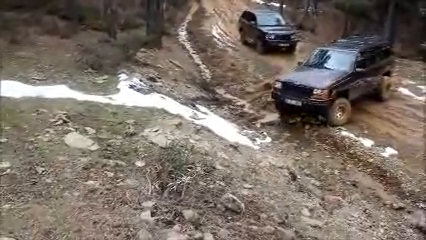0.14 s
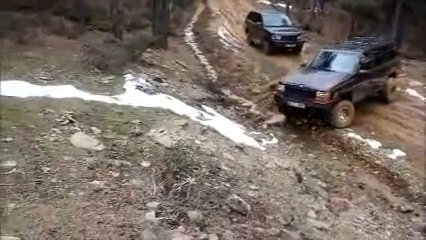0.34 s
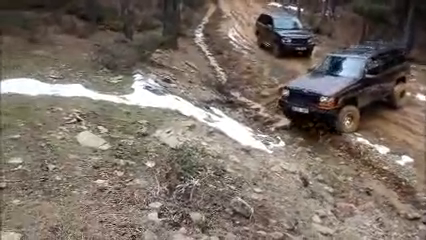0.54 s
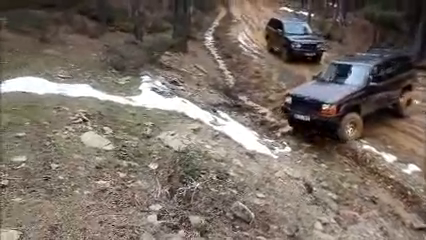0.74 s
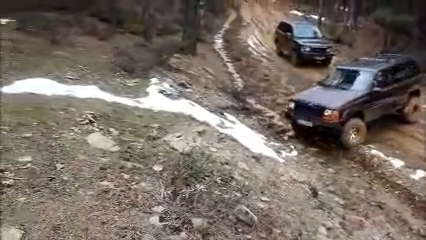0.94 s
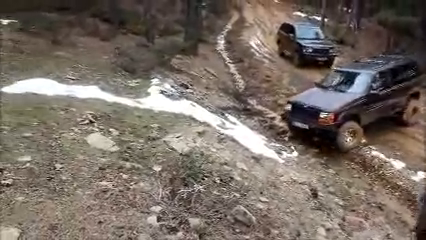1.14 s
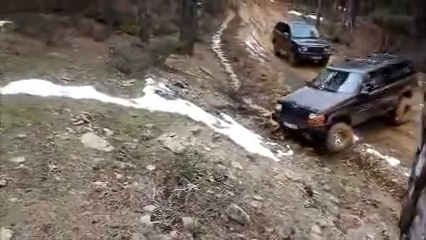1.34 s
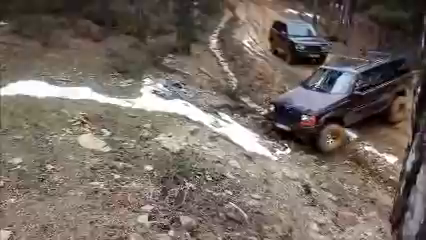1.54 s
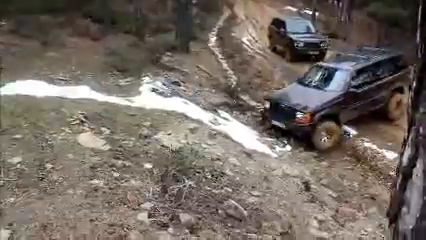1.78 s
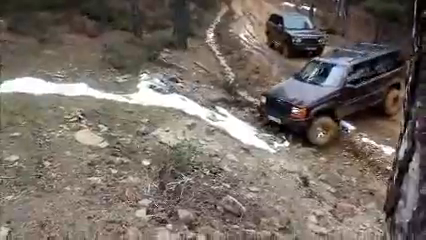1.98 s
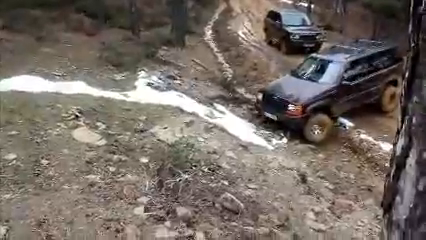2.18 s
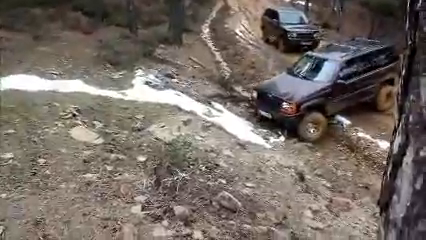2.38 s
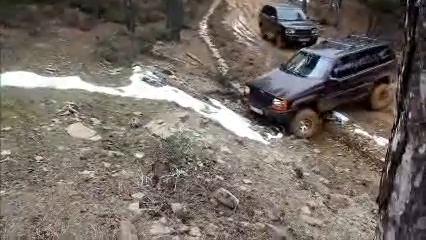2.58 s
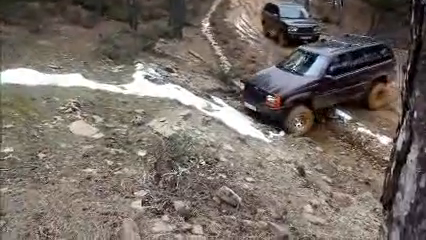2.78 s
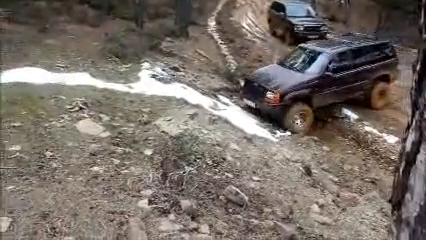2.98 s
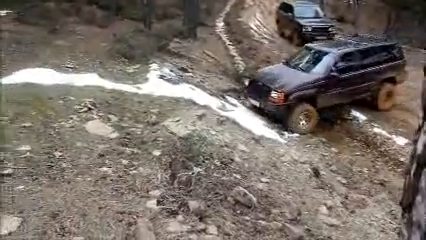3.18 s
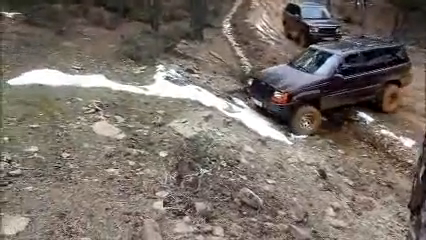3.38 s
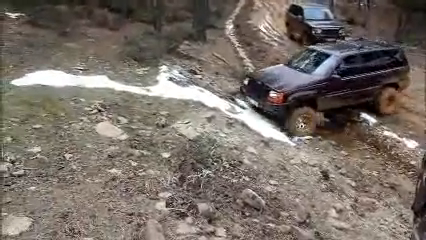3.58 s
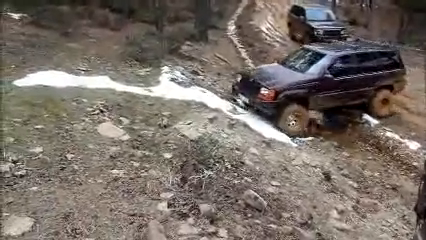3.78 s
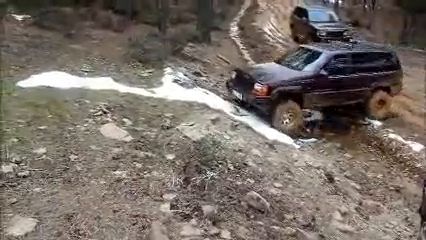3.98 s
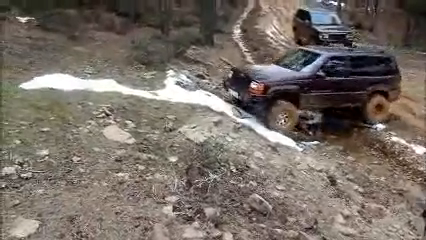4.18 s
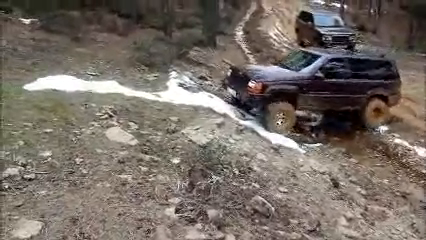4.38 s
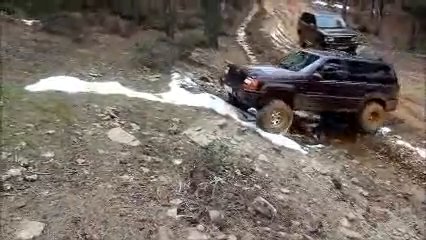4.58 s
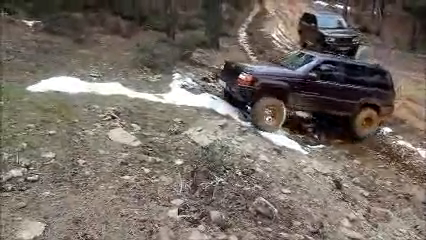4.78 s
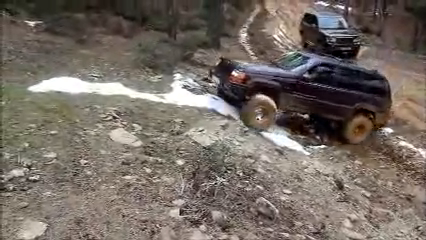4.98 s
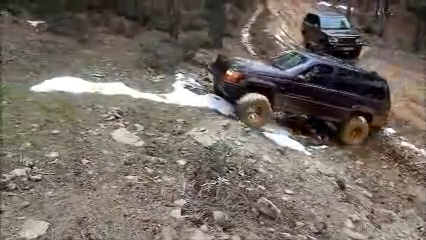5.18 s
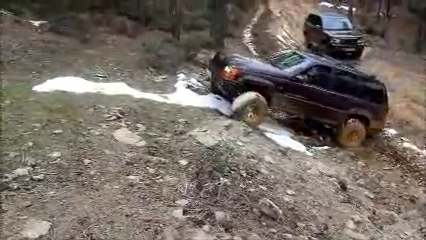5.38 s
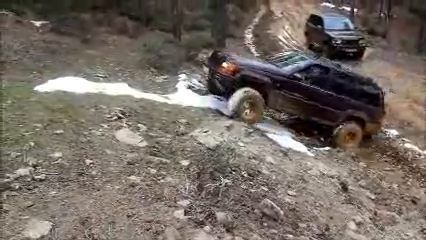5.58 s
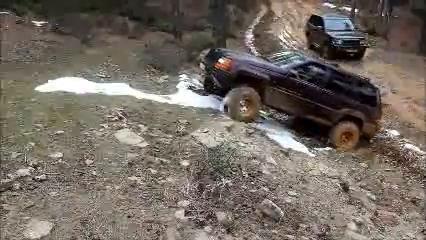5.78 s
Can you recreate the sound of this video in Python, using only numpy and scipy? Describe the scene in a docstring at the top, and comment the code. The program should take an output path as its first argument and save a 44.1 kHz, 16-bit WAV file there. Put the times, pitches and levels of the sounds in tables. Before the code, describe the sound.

A big petrol engine burbles at idle, revs in two swelling blips, then pulls hard as tyres crunch grit and stones tick on a forest trail.

```python
"""Four-wheel-drive on a forest trail

A V8 crawls up a rutted trail, heard from the bank above: it burbles at idle, is blipped twice, then pulls at length.
Timed puffs of gas ring the exhaust pipe, with clean engine orders on top; throbbing noise makes the belts and fan.
Clumped grains grind under the tyres with a high airy hiss; short resonant bursts are stone ticks and a twig.
Dense slips ring the underbody as a rock scrapes it. The ground sounds echo among the trees."""
import sys
import numpy as np
from scipy import signal
from scipy.fft import rfft, irfft, next_fast_len
from scipy.io import wavfile
from scipy.ndimage import uniform_filter1d

SR = 44100
rng = np.random.default_rng(int(sys.argv[2]) if len(sys.argv) > 2 else 0)


def wav_out(sig):
    """Save sig, one row per channel (or a flat mono array), as 16-bit PCM at SR to the path in sys.argv[1]."""
    wavfile.write(sys.argv[1], SR, np.round(np.clip(np.atleast_2d(sig).T, -1, 1) * 32767).astype(np.int16))


N = 257525
TIME = np.arange(N) / SR

# engine speed on the throttle, two blips and a long pull: (time [s], firing rate [per s])
FIRING_RATE = [(2.17, 42.8), (2.35, 65.5), (2.5, 82.2), (2.66, 89.7), (2.8, 82.9), (3.01, 61.6),
               (3.16, 53.1), (3.33, 83.9), (3.46, 108.9), (3.55, 113.5), (3.66, 106.6), (3.75, 95.0),
               (3.89, 75.0), (3.99, 62.9), (4.05, 60.3), (4.4, 76.7), (4.6, 80.9), (4.95, 87.4),
               (5.05, 86.6), (5.22, 80.8), (5.35, 85.8), (5.54, 98.1), (5.69, 102.9), (5.84, 101.1)]
# loudness of the tailpipe: (time [s], level [dB])
EXHAUST_LEVEL = [(0.0, -33.5), (0.86, -36.5), (1.58, -34.5), (2.1, -38), (2.47, -21), (2.75, -19),
                 (3.15, -32), (3.25, -22.5), (3.37, -19), (3.67, -19), (4.02, -31.5), (4.15, -25.5),
                 (4.8, -16), (5.02, -21), (5.06, -17.5), (5.84, -15.5)]
# the eight exhaust puffs of a cycle, some delayed by a longer way through the manifold:
# (idle relative level [dB], idle lateness [ms], loaded relative level [dB], loaded lateness [ms])
PUFFS = [(-3.5, 2.8, -.2, 5.2), (-3.5, -1.1, -4.9, -.3), (-2.5, -.5, 2.5, 5.9), (-1.5, 3.6, .8, 5.9),
         (1, -1.4, -.6, -.8), (-6, -1.2, 3, 5.2), (-10, -.5, -2, 5.4), (4.5, -1.7, .3, 0)]
# silencer and pipe; the slow puffs of idling carry more bass:
# (frequency [Hz], idle relative level [dB], loaded relative level [dB])
PIPE_COLOUR = [(24.6, -27, -23), (40, -15, -4), (52.4, 9, -4), (71, 12, 10), (96, 10, 8.5), (116, 7.5, 11),
               (145, 12.5, 15), (155.6, 18.5, 15), (168, -8, 21), (183.6, 12.5, 14.5), (262, 9.5, 14),
               (280.4, -8.5, 14.5), (318, -31, -4.5), (337, -20, 0.5), (445, -24, -3), (940, -58, -55)]
# clean lines in the exhaust under load:
# (multiple of the engine cycle [], pulling relative level [dB], top-revs relative level [dB])
SINGING_ORDERS = [(5, -9, 3), (8, -7, 6), (10, -24, 0), (11, -5, 3), (13, -11, -10), (14, -17, -7),
                  (16, 0, -5), (19, -14, -7), (21, -6, -8), (22, -7, -4), (24, -9, -9), (25, -3, -8)]
# fan and belt noise: (frequency [Hz], relative level per Hz [dB])
BAY_COLOUR = [(250, 5), (400, -3.5), (600, 0), (780, -2.5), (1100, -4), (1500, -6), (2100, -7), (2800, -13),
              (3800, -14.5), (4800, -22), (7000, -27), (9500, -33), (15500, -34.5)]
# ringing of the engine's covers and brackets: (frequency [Hz], width [Hz], relative level [dB])
COVER_MODES = [(577, 44, -5.5), (1047, 54, 1.5), (1208, 37, 2), (1300, 21, 8)]
# a hum that comes and goes, perhaps the steering pump; rise and fall are times per 20 dB:
# (peak time [s], level [dB], rise [s], fall [s])
HUM_SWELLS = [(3.75, -35, 0.15, 0.34), (4.36, -42, 0.14, 0.3)]
# grit crushed by the tread: (frequency [Hz], relative level per Hz [dB])
GRAVEL_COLOUR = [(300, 1.5), (600, 8.5), (1200, 1.5), (2000, -4.5), (3700, -8.5), (5000, -14), (7500, -19),
                 (15000, -17)]
# high airy hiss: (frequency [Hz], relative level per Hz [dB])
HISS_COLOUR = [(3000, 8), (6000, 6.5), (9000, 3.5), (12000, 6), (15500, -5.5)]
# a tyre slips and crunches on grit; rise and fall are times per 20 dB:
# (peak time [s], level [dB], rise [s], fall [s], pitch [Hz])
TYRE_SLIPS = [(2.69, -34.5, .12, 0.078, 2600), (3.336, -26.5, 0.015, 0.025, 2560),
              (3.374, -29.5, 0.028, 0.053, 2820), (3.436, -29, 0.019, 0.11, 2200),
              (3.5, -38.5, 0.27, 0.41, 1200), (3.546, -33, 0.012, .025, 1900),
              (3.572, -23, .015, 0.013, 900), (3.594, -34, 0.061, 0.077, 2300),
              (5.555, -30.5, .06, 0.035, 1750), (5.578, -34.5, .02, 0.051, 3300),
              (5.711, -27.5, 0.06, 0.11, 1440), (5.795, -39, .025, .05, 2000),
              (5.825, -25, 0.083, 0.08, 1080), (5.69, -34, .2, 0.33, 535)]
# the high airy hiss swells and fades; rise and fall are times per 20 dB:
# (peak time [s], level [dB], rise [s], fall [s])
HISS_SWELLS = [(3.95, -47, 0.39, 1.33), (4.9, -47, 0.17, .25), (5.77, -46, 0.14, 0.37)]
# the loudest stone ticks, one during idle, the rest as the wheels roll; levels before the trims in stones():
# (start time [s], peak level [dB], pitch [Hz], 60 dB decay [s], bright-edge level [dB])
STONE_TICKS = [(1.543, -22.5, 3050, 0.028, -56), (2.6682, -28, 2148, .03, -45),
               (2.7633, -36, 2065, .02, -44), (2.9084, -25, 2130, 0.018, -26),
               (3.0343, -27, 2052, 0.027, -44), (3.1016, -22, 2820, 0.026, -41),
               (3.152, -29, 4500, 0.022, -52), (3.211, -21.5, 2060, 0.071, -42),
               (3.282, -19, 3400, 0.027, -49), (3.3267, -25, 2800, .015, -38),
               (3.3556, -22, 3550, .014, -38), (3.4254, -20, 3300, 0.027, -32),
               (3.4848, -7.5, 1880, .009, -45), (3.489, -21, 1970, 0.019, -45),
               (3.621, -14.5, 2500, 0.01, -44), (3.7026, -20.5, 3850, .014, -58.5),
               (4.7737, -22, 2010, 0.038, -54)]
# the rock catches the underbody; rise and fall are times per 20 dB:
# (peak time [s], level [dB], rise [s], fall [s])
ROCK_SCRAPES = [(4.909, -13.5, 0.011, 0.034), (4.945, -28, 0.017, 0.043), (5.01, -25.5, 0.085, 0.13)]
# rasp of rock on steel: (frequency [Hz], relative level per Hz [dB])
SCRAPE_COLOUR = [(400, -2), (750, -8.5), (1150, 2), (2100, -4), (3700, -6), (5500, -15), (7500, -26),
                 (15000, -56)]
# steel of the underbody: (frequency [Hz], width [Hz], relative level [dB])
UNDERBODY_MODES = [(1112, 110, 10), (1190, 54, 12), (1780, 66, 0), (2078, 87, 0), (3300, 62, 2),
                   (3703, 67, 10), (4600, 80, -23)]
# a twig breaking fibre by fibre: (start time [s], peak level [dB], pitch [Hz], 60 dB decay [s])
TWIG_SNAPS = [(0.7428, -15, 1220, 0.016), (0.7515, -11, 2820, 0.0028), (0.768, -26, 11000, 0.0059),
              (0.7700, -17, 3000, 0.0061), (0.777, -17.5, 2800, 0.0078), (0.802, -24.5, 3480, 0.023)]

# at idle the engine hunts slowly about its mean firing rate, after settling from a faster start
IDLE_FIRING_HZ, HUNT_HZ, HUNT_PERIOD_S = 47.7, 2.2, 1.44
SETTLE_HZ, SETTLE_S = 2.6, .25
START_CYCLE = .235  # fraction of an engine cycle
THROTTLE_S, THROTTLE_RISE_S = 2.17, 0.15  # the driver takes up the load
# chance spread of the loaded firings in level and timing; at idle both are this many times wider
UNEVEN_DB, JITTER_S, IDLE_UNEVENNESS = .8, .0001, 1.6
# gas rush against the puffs at idle speed; it rushes harder with the revs
RUSH_DB, RUSH_DB_PER_OCTAVE = -21, 6
SINGING_DB = -2  # clean lines against the puffs and gas
# the pipe spreads each crest in time [radians per order squared], up to twice as much at top revs
PIPE_SMEAR = .018
GROWL_FROM_OCTAVES, GROWL_FULL_OCTAVES = 0.83, 0.95  # engine speed above idle
# the whirr under the bonnet grows with the revs, and grows steadily louder towards the end
BAY_IDLE_DB, BAY_DB_PER_OCTAVE = -36, 3.5
LATE_RISE_S, LATE_RISE_DB_PER_S = 4.73, 2.5
HUM_HZ, HUM_SAG_HZ_PER_S = 364.6, 5  # pitch at the first hum's peak, and its fall
ROLL_START_S, ROLL_RISE_S = 2.4, 0.18  # the wheels bite and start to roll
GRIND_DB, GRIND_DB_PER_OCTAVE, HISS_DB = -49.5, -3, -57  # grinding is set at idle speed
STONY_FROM_S, STONY_TO_S = 2.65, 4.1  # the tyres cross a patch of loose pebbles
PEBBLES_PER_S, PEBBLE_DB, PEBBLE_SPREAD_DB = 20, -29, 4.5
PEBBLE_HZ, PEBBLE_SPREAD_OCTAVES = 2940, 0.28
CUTOFF_HZ = 15800


def engine_speed():
    """Firings a second: the idle settles and hunts until the driver takes over."""
    hunting = HUNT_HZ * np.cos(2 * np.pi * TIME / HUNT_PERIOD_S)
    settling = SETTLE_HZ * np.exp(-TIME / SETTLE_S)
    idling = IDLE_FIRING_HZ + hunting + settling
    return np.where(TIME < THROTTLE_S, idling, in_time(FIRING_RATE)[0])


def exhaust(cycles, revs):
    """One puff per firing into the pipe; the lopsided pattern that makes the burble changes with load."""
    load = np.clip((TIME - THROTTLE_S) / THROTTLE_RISE_S, 0, 1)
    firing = np.arange(int(len(PUFFS) * cycles[0]) + 1, int(len(PUFFS) * cycles[-1]))
    when = np.interp(firing / len(PUFFS), cycles, TIME)
    share = np.interp(when, TIME, load)
    pattern = np.array(PUFFS)[firing % len(PUFFS)].T
    puff_db, late_ms = (1 - share) * pattern[:2] + share * pattern[2:]

    # each firing differs a little in strength and timing
    unevenness = share + IDLE_UNEVENNESS * (1 - share)
    chance = rng.standard_normal((len(firing), 2)) * unevenness[:, None]
    at = (when + late_ms / 1000) * SR + JITTER_S * SR * chance[:, 1]
    at = np.clip(at, 0, N - 1).astype(int)
    puffs = rms_one(np.bincount(at, from_db(puff_db + UNEVEN_DB * chance[:, 0]), N))

    # turbulent gas rushes through the same pipe
    rush = from_db(RUSH_DB + RUSH_DB_PER_OCTAVE * revs) * rng.standard_normal(N)
    gas = puffs + rush
    pipe = np.array(PIPE_COLOUR)
    idle_pipe, loaded_pipe = pipe[:, :2], pipe[:, ::2]
    burble = rms_one(coloured((1 - load) * gas, idle_pipe) + coloured(load * gas, loaded_pipe))
    song = rms_one(coloured(load * singing(cycles, revs), loaded_pipe))
    sound = burble + from_db(SINGING_DB) * song

    # level out the slow loudness, then ride it along the level curve
    power = uniform_filter1d(uniform_filter1d(sound ** 2, size=SR // 6), size=SR // 6)
    return from_db(in_time(EXHAUST_LEVEL)[0]) * sound / np.sqrt(power + 1e-20)


def singing(cycles, revs):
    """Clean orders crest with the strongest puff of each cycle; the low ones growl near the top of the revs."""
    growl = np.clip((revs - GROWL_FROM_OCTAVES) / (GROWL_FULL_OCTAVES - GROWL_FROM_OCTAVES), 0, 1)
    strongest = np.argmax(np.array(PUFFS)[:, 2])
    late_s = PUFFS[strongest][3] / 1000
    angle = 2 * np.pi * (np.interp(TIME - late_s, TIME, cycles) - strongest / len(PUFFS))
    song = np.zeros(N)
    for order, pull_db, top_db in SINGING_ORDERS:
        gain = from_db(pull_db + growl * (top_db - pull_db))
        smear = PIPE_SMEAR * (1 + growl) * (order - 2 * len(PUFFS)) ** 2
        song += gain * np.cos(order * angle - smear)
    return song


def engine_bay(cycles, revs, throb_db=0.7, rattle_db=0.68, flutter_db=1.0, tick_db=-8, ring_db=-42, knock_db=7):
    """Fan and belt noise throbs with the firings; the covers are shaken twice a turn."""
    firing = np.cos(2 * np.pi * len(PUFFS) * cycles)
    knock = np.cos(np.pi * len(PUFFS) * cycles)
    clatter = rng.standard_normal(N) + from_db(tick_db) * grains(250, spread_db=2.0)
    throb = from_db(throb_db * firing + rattle_db * knock + flutter_db * drift(40))
    whirr = rms_one(coloured(clatter * throb, BAY_COLOUR))
    shake = rng.standard_normal(N) * from_db(knock_db * knock)
    ring = rms_one(ringing(shake, COVER_MODES))
    late_rise_db = LATE_RISE_DB_PER_S * np.maximum(TIME - LATE_RISE_S, 0)
    whirr_db = BAY_IDLE_DB + BAY_DB_PER_OCTAVE * revs + late_rise_db
    return from_db(whirr_db) * whirr + from_db(ring_db) * ring


def hum(waver_db=2):
    """A plain tone sags a little in pitch as it comes and goes."""
    hz = HUM_HZ - HUM_SAG_HZ_PER_S * (TIME - HUM_SWELLS[0][0])
    gain = swells(HUM_SWELLS) * from_db(waver_db * drift(23))
    return gain * np.sqrt(2) * np.sin(2 * np.pi * np.cumsum(hz) / SR)


def tyres(revs, clump_db=3.0, slip_width=2.34):
    """Rolling wheels crush grit in clumps under an airy hiss; each slip crunches at its own pitch."""
    rolling = np.clip((TIME - ROLL_START_S) / ROLL_RISE_S, 0, 1)
    crushing = grains(3500, spread_db=2.5) * from_db(clump_db * drift(140))
    grit = rms_one(coloured(crushing, GRAVEL_COLOUR))
    hiss = rms_one(coloured(rng.standard_normal(N), HISS_COLOUR))
    grinding = from_db(GRIND_DB + GRIND_DB_PER_OCTAVE * revs) * grit
    crunches = np.zeros(N)
    for s, db, rise_s, fall_s, hz in TYRE_SLIPS:
        other_grit = np.roll(grit, rng.integers(N))
        crunch = rms_one(resonance(other_grit, hz, slip_width * hz))
        crunches += swell(s, db, rise_s, fall_s) * crunch
    hiss_gain = np.hypot(from_db(HISS_DB), swells(HISS_SWELLS))
    return rolling * (grinding + crunches + hiss_gain * hiss)


def stones(level_db=-3, pebble_t60=0.021, edge_db=1, pebble_edge_db=-22):
    """Single stones tick as short resonant bursts, with a scatter of pebbles in the stony patch."""
    out = np.zeros(N)
    for s, db, hz, t60, bright_db in STONE_TICKS:
        sound = crack(hz, t60, width=0.45, treble_db=bright_db - db + edge_db)
        add(out, s, from_db(db + level_db) * sound)
    for _ in range(round(PEBBLES_PER_S * (STONY_TO_S - STONY_FROM_S))):
        s = rng.uniform(STONY_FROM_S, STONY_TO_S)
        db = rng.normal(PEBBLE_DB, PEBBLE_SPREAD_DB)
        hz = PEBBLE_HZ * 2 ** (PEBBLE_SPREAD_OCTAVES * rng.standard_normal())
        add(out, s, from_db(db) * crack(hz, pebble_t60, width=0.84, treble_db=pebble_edge_db))
    return out


def rock(ring_db=-13):
    """A hard knock and a weaker drag, both made of dense slips that set the steel ringing."""
    slips = swells(ROCK_SCRAPES) * grains(14000, spread_db=1.3)
    rasp = rms_one(coloured(slips, SCRAPE_COLOUR))
    ring = rms_one(ringing(slips, UNDERBODY_MODES))
    return np.std(slips) * (rasp + from_db(ring_db) * ring)


def twig():
    """A dry twig gives way in a quick run of snaps."""
    out = np.zeros(N)
    for s, db, hz, t60 in TWIG_SNAPS:
        add(out, s, from_db(db) * crack(hz, t60, width=0.73, treble_db=-18))
    return out


def forest(x, t60=0.52, wet_db=-9, dull_hz=5000):
    """Trunks and the bank scatter sparse, dull echoes."""
    age = TIME[:SR // 2]
    sparse = rng.standard_normal(len(age)) * (rng.random(len(age)) < 900 / SR)
    echoes = sparse * from_db(-60 * age / t60)
    echoes = signal.sosfilt(signal.butter(1, dull_hz, fs=SR, output="sos"), echoes)
    return x + from_db(wet_db) * signal.fftconvolve(x, echoes / np.linalg.norm(echoes))[:N]


def crack(hz, t60, width, treble_db):
    """A brittle break: a dying burst in one broad resonance, with a bright edge; peak 1."""
    age = TIME[:SR // 10]
    attack = np.minimum(10 * age / t60, 1)
    burst = rng.standard_normal(len(age)) * from_db(-60 * age / t60) * attack
    body = resonance(resonance(burst, hz, width * hz), hz, 2 * width * hz)
    edge = signal.sosfilt(signal.butter(2, 7000, "high", fs=SR, output="sos"), burst)
    sound = body / np.abs(body).max() + from_db(treble_db) * edge / np.abs(edge).max()
    return sound / np.abs(sound).max()


def grains(per_s, spread_db):
    """Random clicks of very uneven size; unit power."""
    sizes = from_db(spread_db * np.minimum(rng.exponential(1, N), 4))
    return rms_one((rng.random(N) < per_s / SR) * sizes * rng.standard_normal(N))


def resonance(x, hz, width_hz):
    """Two-pole resonance with gain 1 on top."""
    r = np.exp(-np.pi * width_hz / SR)
    feed = np.array([1, 0, -1]) * (1 - r * r) / 2
    return signal.lfilter(feed, [1, -2 * r * np.cos(2 * np.pi * hz / SR), r * r], x + 1e-18)


def ringing(x, modes):
    """Metal parts ring side by side, each mode at its own level."""
    return sum(from_db(db) * resonance(x, hz, width_hz) for hz, width_hz, db in modes)


def coloured(x, spectrum):
    """Causal (minimum-phase) filter with the given spectrum, falling off below its first point."""
    size = 2 * next_fast_len(N)
    hz, db = np.transpose(spectrum)
    octave = np.log2(np.maximum(np.arange(size // 2 + 1) * SR / size, 10))
    low_cut_db = 20 * np.maximum(np.log2(hz[0]) - octave, 0)
    curve = np.interp(octave, np.log2(hz), db) - low_cut_db
    cepstrum = irfft(np.log(from_db(curve)))
    # folding the cepstrum onto positive times makes the filter causal
    response = np.exp(rfft(2 * cepstrum[:size // 2], size) - cepstrum[0])
    return irfft(rfft(x, size) * response)[:N]


def swell(s, db, rise_s, fall_s):
    """A gain that climbs 20 dB in rise_s to its peak at time s, then loses 20 dB every fall_s."""
    return from_db(db - 20 * np.maximum((s - TIME) / rise_s, (TIME - s) / fall_s))


def swells(rows):
    """The joint gain of several swells, added as powers."""
    return np.sqrt(sum(swell(*row) ** 2 for row in rows))


def drift(rate):
    """Smooth chance with about `rate` turns a second; spread 1."""
    return rms_one(np.interp(TIME * rate, np.arange(6000), rng.standard_normal(6000)))


def in_time(rows):
    """Each column of a curve at every sample."""
    s, *columns = np.transpose(rows)
    return [np.interp(TIME, s, c) for c in columns]


def add(out, s, sound):
    """Mix a sound in at time s."""
    start = round(s * SR)
    out[start:start + len(sound)] += sound[:N - start]


def from_db(db):
    """Decibels to gain."""
    return 10 ** (np.asarray(db) / 20)


def rms_one(x):
    """Scale to unit power."""
    return x / np.sqrt(np.mean(x ** 2) + 1e-20)


def scene():
    """Engine speed drives exhaust, engine bay and tyres; the ground sounds echo among the trees."""
    firing_hz = engine_speed()
    cycles = START_CYCLE + np.cumsum(firing_hz / len(PUFFS)) / SR
    revs = np.log2(firing_hz / IDLE_FIRING_HZ)  # octaves above idle
    engine = exhaust(cycles, revs) + engine_bay(cycles, revs) + hum()
    ground = tyres(revs) + twig() + rock() + stones()
    return (engine + forest(ground))[None]


def record(dry):
    """The top is cut steeply."""
    return signal.sosfilt(signal.ellip(10, .1, 90, CUTOFF_HZ, fs=SR, output="sos"), dry)


dry = scene()
out = record(dry)
wav_out(out)
```